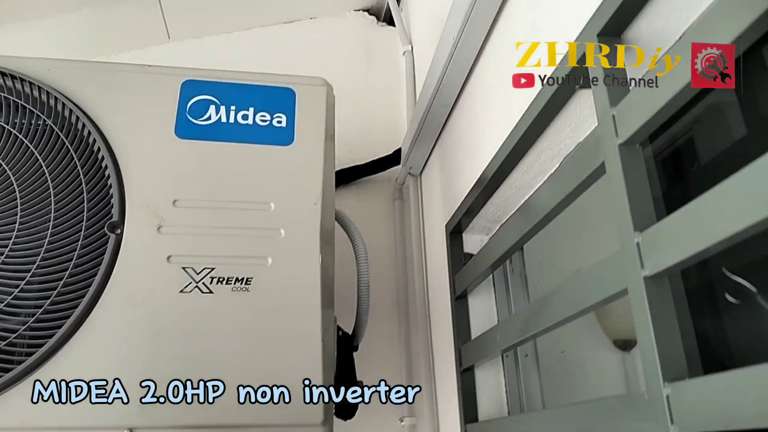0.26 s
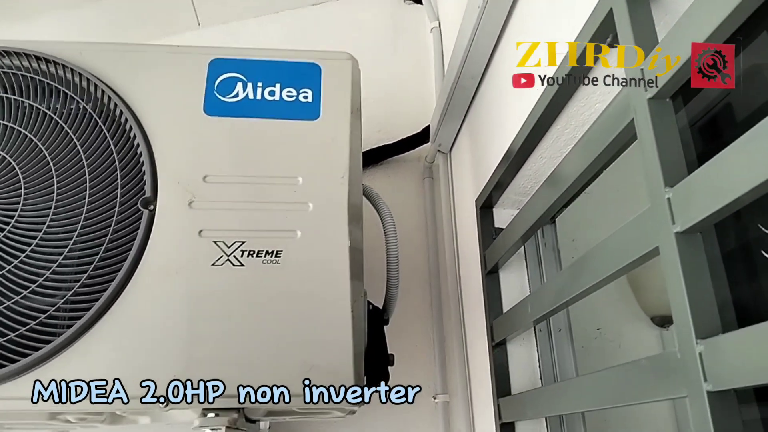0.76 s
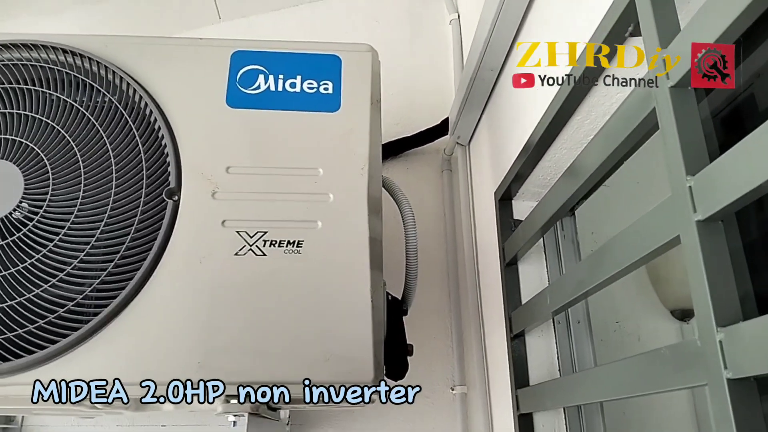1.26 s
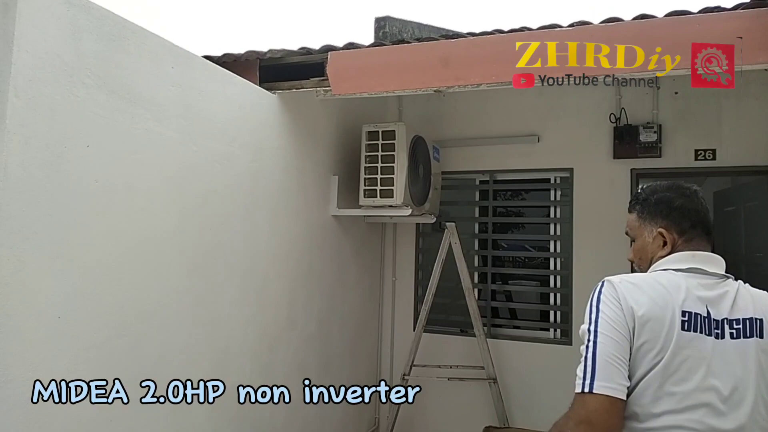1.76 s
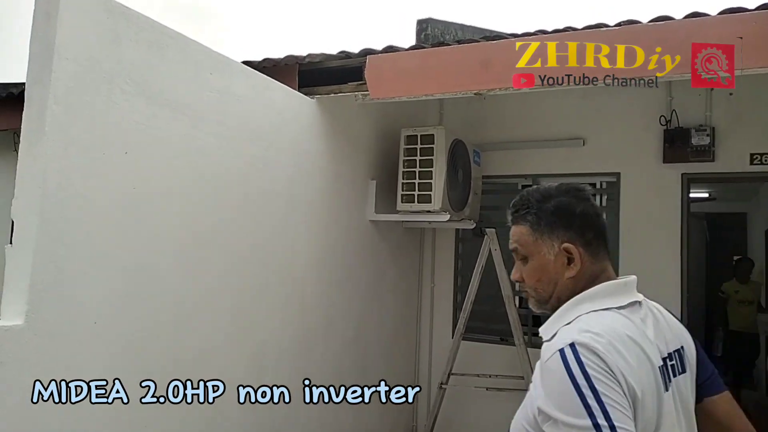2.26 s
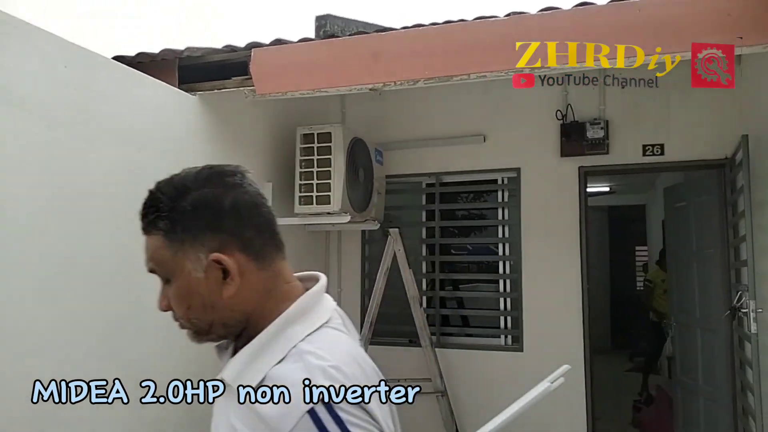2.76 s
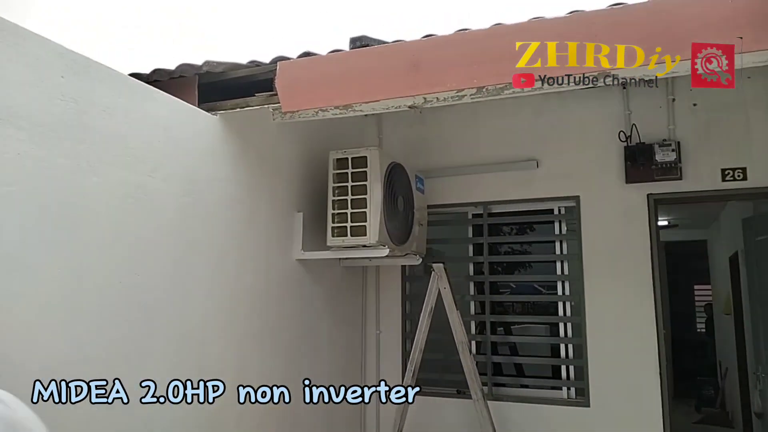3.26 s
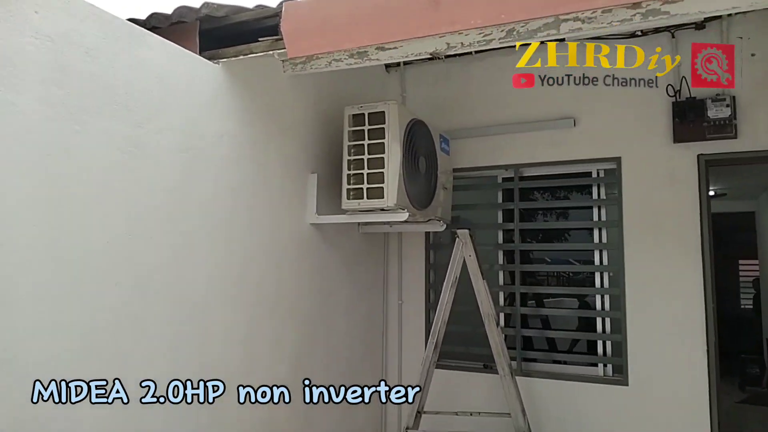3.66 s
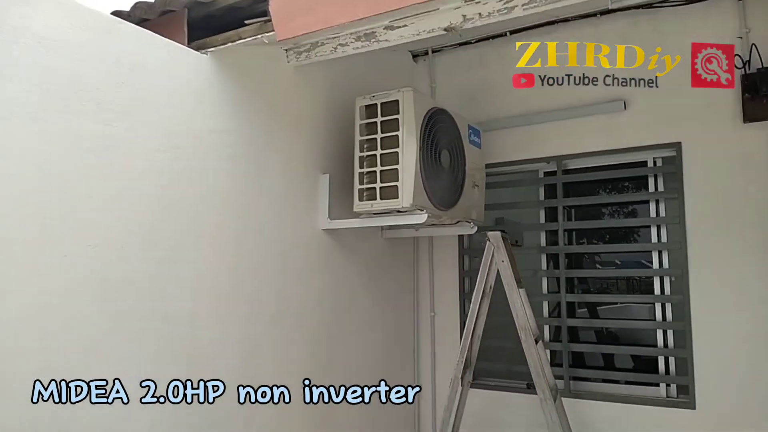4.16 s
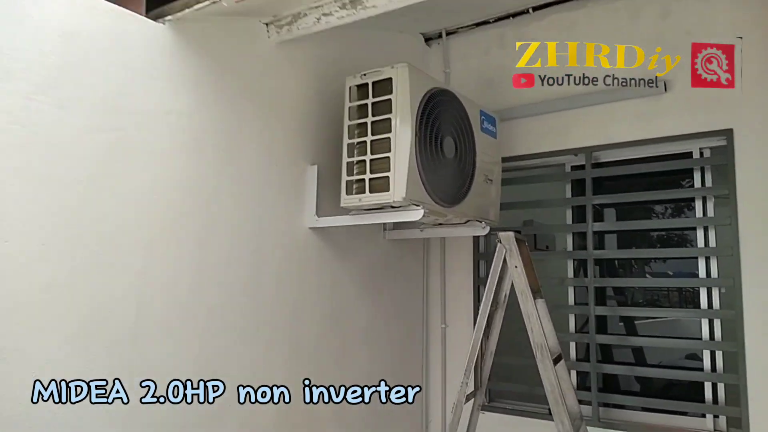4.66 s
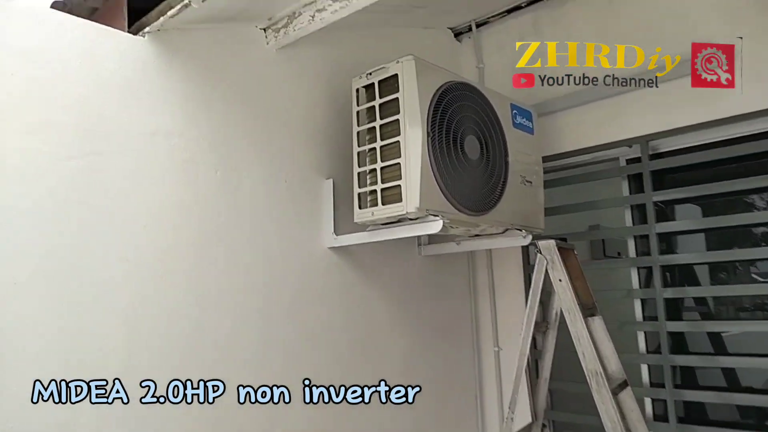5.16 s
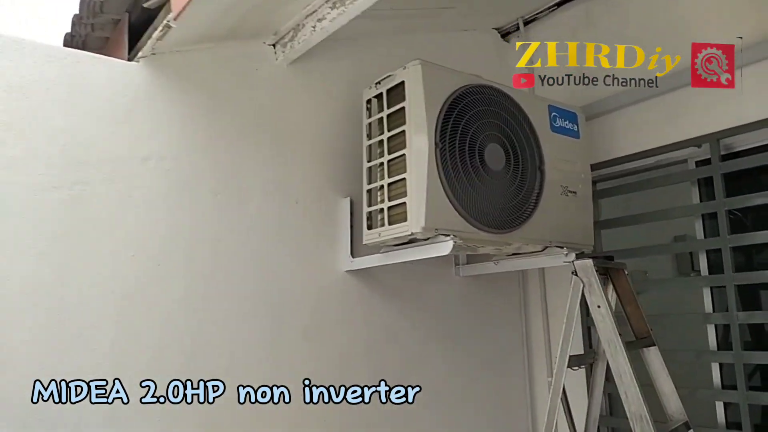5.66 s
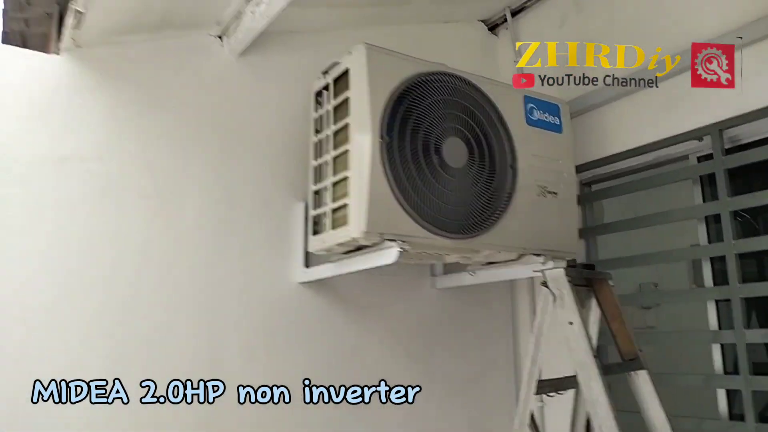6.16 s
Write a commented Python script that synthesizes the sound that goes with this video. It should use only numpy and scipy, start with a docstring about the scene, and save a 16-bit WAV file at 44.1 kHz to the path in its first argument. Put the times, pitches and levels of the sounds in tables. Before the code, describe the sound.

The outdoor unit of an air conditioner is heard close from the start: a low, slightly throbbing compressor hum, a thin whine and the whoosh of its fan over a soft rumble. A hand rubs and scrapes the microphone, with brief scratchy hisses near 0.3 and 0.9 seconds. At about 1.4 seconds the unit suddenly sounds quieter, as if from across the yard, with soft bumps and more rubbing. From 2 seconds the hum and whoosh slowly come nearer again. Around 3.8 to 4 seconds the hand makes a dull bump and a quick cluster of sharp clicks. The loudest event is a hard, scraping knock at about 4.7 seconds, followed by a smaller knock near 4.9. Lighter scrapes and ticks continue over the running unit until the end, at about 6.4 seconds.

```python
"""The outdoor unit of an air conditioner hums and blows on a house wall, first heard close: its compressor and
fan give harmonic tones, its turbulent air a whoosh. From the start, the hand that carries the microphone rubs
and scrapes its case by friction. At 1.35 s the scene changes: the unit is now heard from across the yard, with
soft bumps, and from 2 s it slowly comes nearer again. From 3.8 s the hand also knocks the case sharply a few
times, hardest near 4.7 s."""
import sys
import numpy as np
from scipy import signal
from scipy.fft import rfft, irfft
from scipy.io import wavfile

SR = 44100
rng = np.random.default_rng(int(sys.argv[2]) if len(sys.argv) > 2 else 0)


def master(y):
    """Save y as 16-bit WAV."""
    cut = np.clip(np.atleast_2d(y).T, -1, 1)
    pcm = np.round(cut * 32767)  # scale
    wavfile.write(sys.argv[1], SR, pcm.astype(np.int16))


N = 283111
T = np.arange(N) / SR
SHAFT_HZ, BLADE_HZ, MAINS_HZ = 48.33, 43.7, 50.0

# Compressor tones of cabinet and shell. Each row: multiple of the shaft rate, relative level in dB.
CABINET_DRONE = [(1, -23), (4, 0.5), (5, -28)]
SHELL_WHINE = [(6, -1), (7, -3), (9, -2.5), (10, -8.5), (12, -18), (16, -4.5), (19, -4.5), (20, -1),
               (21, 2.5), (30, -11), (39, -11.5), (64, -18.5), (80, -22), (90, -13)]
# Fan tones. Each row: multiple of the blade rate, relative level in dB.
BLADE_TONES = [(2, -14.5), (3, 1.5), (4, -21), (6, -16), (7, -29)]
# Level curves of the fan tones (set by the angle to the fan), the mains hum and the air's rumble.
# Each row: time in seconds, relative level in dB.
BLADE_CURVE = [(0.06, -30), (0.6, -36.5), (0.85, -30), (1.3, -31), (1.39, -43), (2.92, -48), (4.27, -36.5),
               (5.11, -40), (5.39, -34), (6.31, -42), (6.36, -39)]
HUM_CURVE = [(0, -42.5), (3.8, -44), (4.5, -53), (6.42, -70)]
RUMBLE_CURVE = [(0, -35.5), (2.25, -39.5), (2.65, -44), (4.8, -45.5), (5.5, -43), (6.42, -46)]
# Noise spectra: air beside the unit, in the yard and before the grille; gusts; sliding skin.
# Each row: frequency in Hz, relative spectral density in dB.
NEAR_SPECTRUM = [(100, 5), (150, 9.5), (240, 5), (350, -0.5), (500, 0.5), (720, -5), (1000, 0),
                 (1400, -4.5), (2100, -15.5), (2800, -20), (4300, -18.5), (5200, -30.5), (9000, -38.5),
                 (16000, -44)]
YARD_SPECTRUM = [(100, 6.5), (170, 10), (260, 6.5), (350, 1.5), (500, 1), (750, 0.5), (1000, 2.5),
                 (1350, -0.5), (1900, -7), (2800, -18.5), (4300, -14), (5200, -29), (9000, -32),
                 (16000, -35)]
GRILLE_SPECTRUM = [(500, -25), (1100, -6), (1300, -5), (1700, 1.5), (2300, 1), (2700, -12), (4000, -40)]
RUMBLE_SPECTRUM = [(10, -23), (25, 6.5), (60, 4.5), (90, 3), (130, -6.5), (250, -6), (600, -106)]
SKIN_SPECTRUM = [(300, -17), (1000, 0.5), (1500, 8.5), (2400, 6.5), (3100, 4), (4300, 9.5), (5000, 4),
                 (6200, 5), (6950, 1.5), (7500, -0.5), (9000, -1), (10700, -1), (11600, 2.5), (12600, 0),
                 (15000, -3), (15700, -9)]
# The listener's path. Each row: time in seconds, distance from the unit in metres.
PATH = [(0, 0.5), (.65, 0.65), (1.05, 0.54), (1.338, 0.66), (1.44, 5.7), (2.0, 5.7), (2.9, 4), (3.75, 2.4),
        (4.3, 2), (5.3, 1.37), (6.42, 1.14)]
# Strokes of the hand. Each row: start, rise, hold and release in seconds, relative level in dB.
HAND_STROKES = [(0.09, 0.022, 0.013, .03, -56.5), (0.164, .005, .005, .012, -49.5),
                (0.205, 0.081, 0.077, 0.05, -45.5), (0.652, 0.2, .06, .11, -41),
                (1.347, 0.019, 0.34, 0.026, -46.5), (1.889, 0.037, .15, .06, -52),
                (2.254, 0.033, 0.066, 0.027, -57), (2.592, 0.018, 0.24, 0.025, -52),
                (2.939, 0.037, 0.044, 0.059, -53.5), (3.123, 0.025, .015, 0.034, -56),
                (3.36, .01, 0.059, .03, -56), (3.417, 0.032, 0.013, 0.033, -50.5),
                (3.54, 0.028, 0.07, 0.077, -54), (3.726, 0.13, 0.025, .09, -44.5),
                (3.968, 0.0099, 0.015, 0.027, -43), (4.08, .035, 0.11, 0.037, -50.5),
                (4.6, 0.05, 0.04, .02, -48.5), (4.669, 0.0065, 0.029, 0.032, -30.5),
                (4.873, .05, 0.023, 0.058, -42), (5.42, .02, .06, .02, -58),
                (5.576, 0.077, 0.041, 0.14, -45.5), (5.94, 0.033, 0.0084, .025, -52),
                (6.108, 0.014, .015, 0.032, -53), (6.16, .1, 0.021, 0.16, -50)]
# Harder scrapes. Each row: peak time in seconds, level in dB, rise and fall in seconds,
# frequency in Hz at which the slips gather.
HAND_SCRAPES = [(0.292, -35.5, 0.06, 0.075, 1410), (0.851, -35, 0.026, 0.022, 2700),
                (.9, -36.5, 0.041, 0.073, 5550), (1.431, -36.5, 0.058, 0.095, 1487),
                (1.691, -35.5, 0.12, 0.029, 1720), (2.08, -43, 0.086, 0.057, 4300),
                (2.625, -44.5, 0.025, 0.13, 2380), (3.83, -40.5, 0.043, 0.13, 4170),
                (3.853, -30.5, 0.008, 0.031, 1620), (3.933, -32, 0.0082, 0.038, 1590),
                (3.981, -33, 0.03, 0.038, 1700), (4.149, -41, 0.066, 0.081, 5600),
                (4.7, -18, 0.014, 0.033, 2170), (4.704, -19, 0.026, 0.051, 1140),
                (4.897, -30, 0.012, 0.088, 3910), (4.955, -29.5, 0.056, 0.065, 1370),
                (5.204, -37.5, 0.077, 0.071, 1420), (5.322, -35.5, 0.014, 0.045, 1440),
                (5.68, -41, 0.048, 0.15, 3860), (6.151, -40.5, 0.27, 0.08, 1340),
                (6.239, -46.5, 0.21, 0.018, 3500)]
# Modes of the microphone's case. Each row: frequency in Hz, bandwidth in Hz, relative level in dB.
CASE_MODES = [(383, 51, -12), (1070, 70, 4), (1244, 71, 5.5), (1378, 7.8, 9), (1550, 550, -1.5),
              (2130, 310, -5.5), (2390, 22, -4), (2920, 420, -7), (3320, 74, -5), (3580, 150, -2.5),
              (3940, 190, -1.5), (4275, 77, -0.5), (5140, 1600, -21.5)]
# Knocks on the case. Each row: start in seconds, level in dB, pitch in Hz, time in seconds to
# decay by 60 dB, click and crack levels in dB relative to the ring.
CASE_KNOCKS = [(3.8418, -11, 1267, 0.049, 3.5, -12), (3.8444, -21, 1210, 0.034, 13, -22),
               (3.878, -22.5, 1250, .03, 5, -22), (3.9238, -19, 1500, 0.014, -10, -19),
               (3.9756, -15, 1610, 0.0092, 2, -11), (4.648, -21, 1300, 0.026, -20, -20),
               (4.661, -12.5, 1350, 0.012, 0, -10), (4.679, 2.5, 1420, 0.01, -0.5, -3),
               (4.697, -6, 1097, 0.036, -10, -25), (4.706, -14.5, 395, 0.017, 1, -22),
               (4.712, -7, 1240, 0.017, -5, -10), (4.9215, -5, 1240, 0.011, -7, -30),
               (5.2, -24, 1680, 0.015, -6, -16), (5.266, -19, 1310, 0.017, -4, -13),
               (6.142, -28, 1400, 0.0078, 8, -16)]
# Dull bumps. Each row: peak time in seconds, level in dB, pitch in Hz, half length in seconds.
DULL_BUMPS = [(1.367, -25, 60, 0.0089), (1.413, -25, 108, 0.018), (1.455, -25, 50, .012),
              (2.19, -33, 173.4, 0.054), (2.26, -43, 323, 0.037), (3.705, -25, 93, 0.006),
              (3.767, -23.5, 77, 0.021)]


def machine(throb_hz=4.1):
    """Periodic forces radiate harmonics: compressor, fan blades, motor iron at twice the mains rate."""
    throb = 1 + 0.17 * np.sin(2 * np.pi * throb_hz * T)
    drone = amp(-37.5) * throb * tones(SHAFT_HZ, CABINET_DRONE, wander=0.0022, flutter=0.15)
    drone *= spreading(falloff=1)
    whine = amp(-58.5) * tones(SHAFT_HZ, SHELL_WHINE, wander=0.00054, flutter=0.53)  # fills the yard
    blades = amp(-1) * level(BLADE_CURVE) * tones(BLADE_HZ, BLADE_TONES, wander=0.0014, flutter=0.093)
    hum = amp(2.4) * level(HUM_CURVE) * tones(MAINS_HZ, [(2, 0)], wander=0, flutter=0.039)
    return drone + whine + blades + hum


def airflow(yard_from_s=1.353):
    """Turbulence radiates broadband noise, lightly modulated by the blades, above a gusty rumble."""
    close = T < yard_from_s
    near = amp(-36) * reflections(coloured(rng.standard_normal(N), [(10, -30)] + NEAR_SPECTRUM))
    yard = amp(-37.5) * reflections(coloured(rng.standard_normal(N), [(12, -34)] + YARD_SPECTRUM))
    chop = 1 + 0.024 * np.sin(2 * np.pi * BLADE_HZ * T)
    whoosh = np.where(close, near, yard) * chop * amp(0.5 * drift(29))
    whoosh *= spreading(falloff=0.35)  # the walls hold the level up
    facing = close * np.interp(T, [0.65, 1.15], [0, 1])  # the fan beams its upper roar forward
    roar = amp(-44.5) * facing * coloured(rng.standard_normal(N), GRILLE_SPECTRUM)
    rumble = amp(-2) * level(RUMBLE_CURVE) * coloured(rng.standard_normal(N), RUMBLE_SPECTRUM)
    return whoosh + roar + rumble


def sliding(hiss_floor_db=-68):
    """Sliding friction of skin on the case gives a bright, wavering hiss during each stroke."""
    floor = amp(hiss_floor_db)  # a faint steady hiss between the hand's strokes
    power = floor ** 2 + sum(stroke(*row) ** 2 for row in HAND_STROKES)
    envelope = np.sqrt(power) * amp(1.3 * drift(27))
    grain = slips(per_s=3900, spread_db=4.5, smooth=1.1)
    hiss = reflections(grain, delays_s=(0.001, 0.008), echo_db=-19)  # inside the case
    return amp(3.5) * envelope * coloured(hiss, SKIN_SPECTRUM)


def stroke(start, rise, hold, release, db):
    """Friction noise follows contact pressure: the hand presses on smoothly, holds, and lets go."""
    t = np.maximum(T - start, 0)
    press = np.sin(np.pi / 2 * np.minimum(t / rise, 1)) ** 2
    return amp(db) * press * np.exp(-np.maximum(t - rise - hold, 0) / release)


def scraping(focus_q=2.8, broadband=0.77, dull_hz=6500):
    """Under more pressure, stick-slip friction gathers round one rate and excites the case's modes."""
    t, f = T[:SR], np.fft.rfftfreq(SR, 1 / SR) + 1
    modes = sum(amp(db) * width * np.exp(-np.pi * width * t) * np.cos(2 * np.pi * hz * t)
                for hz, width, db in CASE_MODES)
    response = rfft(modes) / (1 + (f / dull_hz) ** 4)  # soft skin cannot drive the top octave
    out = np.zeros(N + 2 * SR)
    for peak_s, db, rise, fall, hz in HAND_SCRAPES:
        focus = broadband + 1 / (1 + 1j * focus_q * (f / hz - hz / f))
        friction = slips(per_s=3300, spread_db=4, smooth=1.16, size=SR)
        grain = unit(irfft(rfft(friction) * focus * response, SR))
        force = amp(db) * np.exp(-np.maximum((0.5 - t) / rise, (t - 0.5) / fall))  # peaks mid-second
        out[round(peak_s * SR):][:SR] += force * grain
    return out[SR // 2:][:N]


def slips(per_s, spread_db, smooth, size=N):
    """Stick-slip friction: tiny impulses of uneven size over a smooth hiss."""
    jerks = amp(spread_db * np.minimum(rng.exponential(1, size), 3)) * rng.choice([-1, 1], size)
    slipping = rng.random(size) < per_s / SR
    return unit(unit(jerks * slipping) + smooth * rng.standard_normal(size))


def knocking(click_hz=4150, click_t60=0.005, crack_t60=0.0062, attack_s=0.00057, wall_t60=0.46):
    """Impact excites a damped ring, a high click and a crack; the walls reverberate faintly."""
    out, t = np.zeros(N + SR), T[:SR // 8]
    onset = 1 - np.exp(-(t / attack_s) ** 2)
    for start, db, hz, t60, click_db, crack_db in CASE_KNOCKS:
        ring = amp(-60 * t / t60) * np.sin(2 * np.pi * hz * t)
        click = amp(click_db - 60 * t / click_t60) * np.sin(2 * np.pi * click_hz * t)
        noise = signal.lfilter([0.6], [1, -0.5], rng.standard_normal(len(t)))
        crack = amp(crack_db - 60 * t / crack_t60) * noise
        out[round(start * SR):][:len(t)] += amp(db) * (ring + click + crack) * onset
    t = T[:SR // 2]
    tail = rng.standard_normal(len(t)) * amp(-60 * t / wall_t60) * (t > 0.004)
    return out[:N] + amp(-10.5) * signal.fftconvolve(out, tail / np.linalg.norm(tail))[:N]


def bumping():
    """A low tone under a short Gaussian envelope is heard as a soft bump."""
    return sum(amp(db) * np.exp(-((T - s) / length) ** 2)
               * np.sin(2 * np.pi * (hz * (T - s) + rng.random()))
               for s, db, hz, length in DULL_BUMPS)


def reflections(x, delays_s=(0.001834, 0.03), echo_db=-20, count=8):
    """Comb filtering: echoes, by default off nearby walls, interfere and ripple the spectrum."""
    echoes = sum(np.roll(x, int(delay * SR)) for delay in rng.uniform(*delays_s, count))
    return unit(x + amp(echo_db) * echoes)


def spreading(falloff):
    """Sound pressure falls as a power of distance: falloff is 1 in open air, the gain 1 at one metre."""
    times, metres = np.transpose(PATH)
    return np.interp(T, times, metres ** -falloff)


def tones(hz, harmonics, wander, flutter):
    """Harmonics share one wandering rate; moving air modulates the amplitude of each."""
    turns = np.cumsum(hz * (1 + wander * drift(1.81))) / SR
    return sum(amp(db) * (1 + flutter * drift(7.2))
               * np.sqrt(2) * np.sin(2 * np.pi * (k * turns + rng.random()))
               for k, db in harmonics)


def coloured(x, spectrum):
    """Filtering imposes a spectrum on x, at rms 1."""
    hz, db = np.transpose(spectrum)
    f = np.fft.rfftfreq(N, 1 / SR)
    gain = amp(np.interp(np.log(f + 1), np.log(hz), db))
    return unit(irfft(rfft(x) * gain, N))


def drift(hz):
    """Low-pass noise: a random fluctuation of rms 1, up to about hz."""
    f = np.fft.rfftfreq(N, 1 / SR)
    return unit(irfft(rfft(rng.standard_normal(N)) * np.exp(-(f / hz) ** 2), N))


def level(curve):
    """Interpolates a dB curve into a gain for every sample."""
    return amp(np.interp(T, *np.transpose(curve)))


def amp(db):
    """Decibels to amplitude ratio."""
    return 10 ** (np.asarray(db) / 20)


def unit(x):
    """Normalises to rms 1."""
    return x / np.sqrt(np.mean(x ** 2) + 1e-20)


def scene():
    """Superposition: the unit and the handling noises add, in mono."""
    return (machine() + airflow() + sliding() + scraping() + knocking() + bumping())[None]


def record(dry):
    """Clipping at full scale, then a low-pass band limit."""
    low_pass = signal.firwin(511, 15900, window=("kaiser", 9), fs=SR)
    return signal.oaconvolve(np.clip(dry, -1, 1), low_pass[None], "same")


dry = scene()
out = record(dry)
master(out)
```